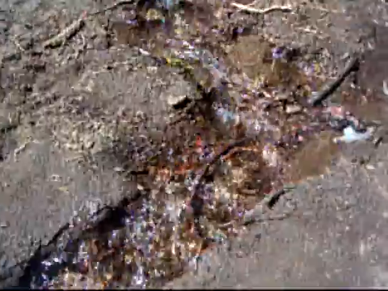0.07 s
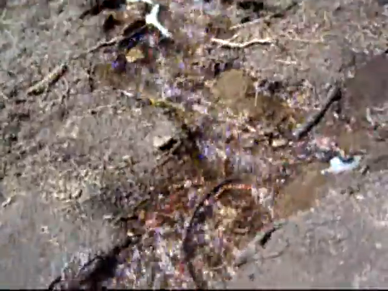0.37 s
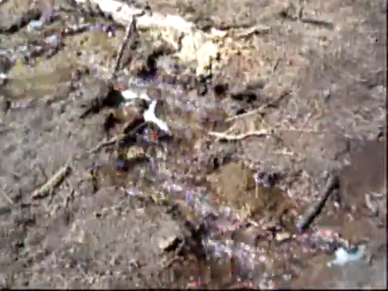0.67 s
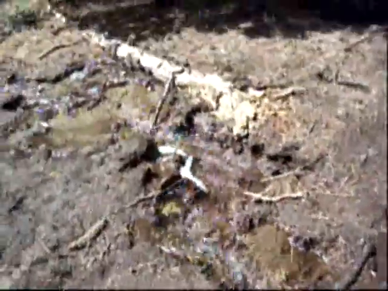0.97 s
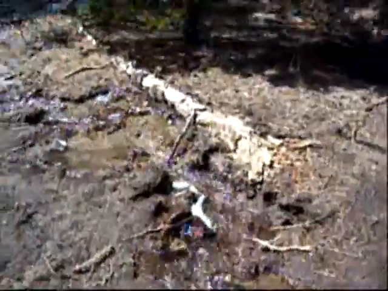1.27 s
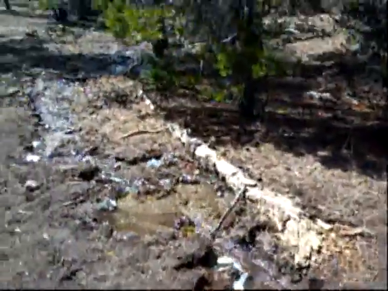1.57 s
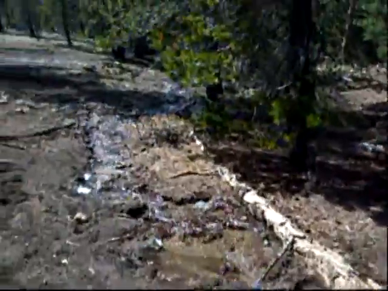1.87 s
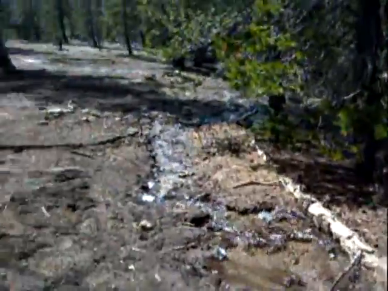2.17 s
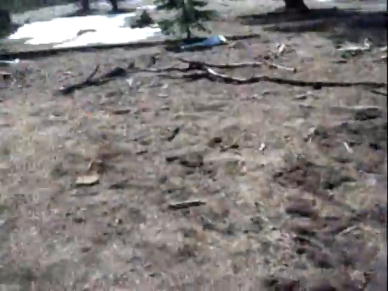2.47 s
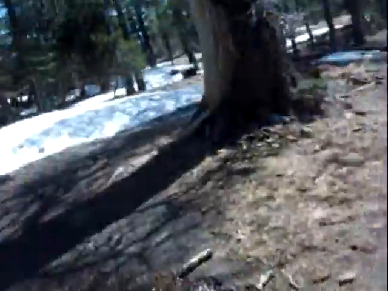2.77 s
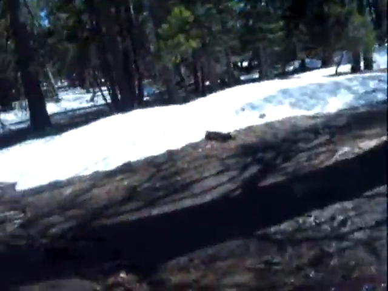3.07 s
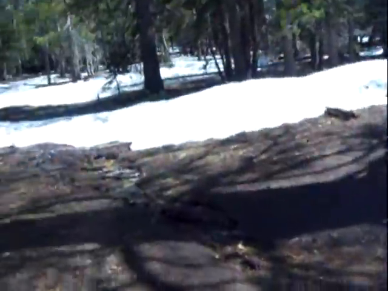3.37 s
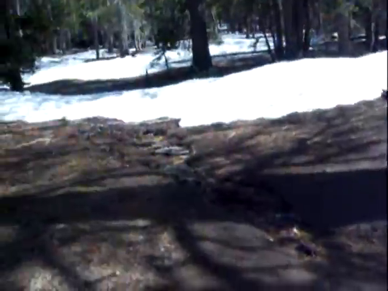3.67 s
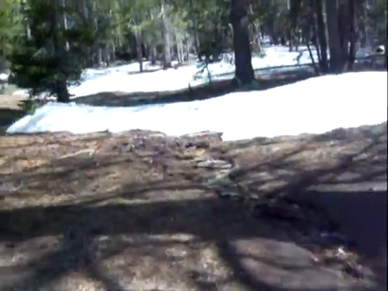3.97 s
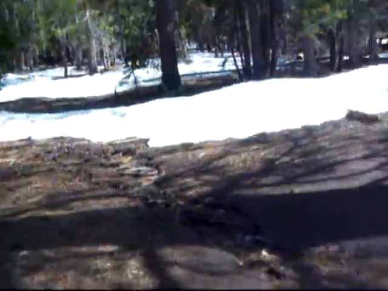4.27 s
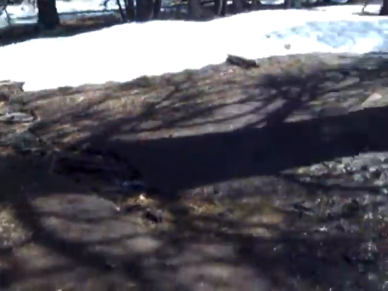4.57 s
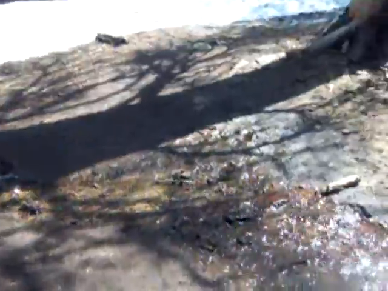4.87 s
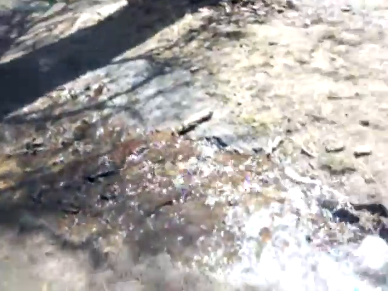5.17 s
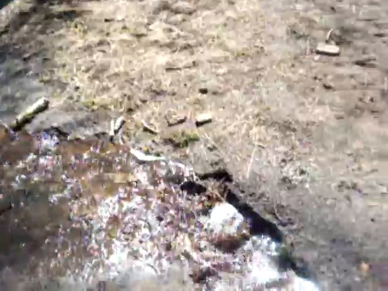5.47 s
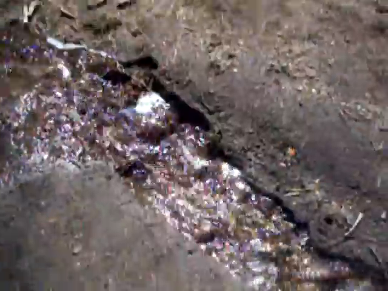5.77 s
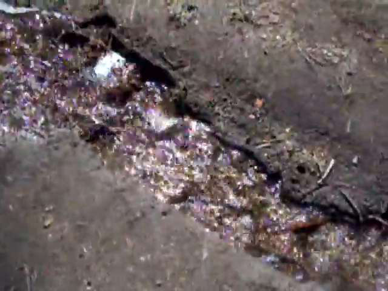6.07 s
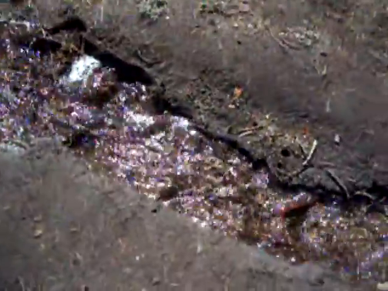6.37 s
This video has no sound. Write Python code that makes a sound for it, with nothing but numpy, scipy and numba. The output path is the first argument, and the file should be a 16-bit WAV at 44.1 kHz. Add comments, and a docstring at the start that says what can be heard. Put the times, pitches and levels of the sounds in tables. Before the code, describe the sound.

Heard through a small hand-held microphone outdoors, a little stream gurgles and splashes throughout, with a low rumble of air and soft bumps underneath. The rush loses some treble, then close scrapes of skin, one hard click and a quick clatter of knocks on plastic stand out well above it. The handling dies down and the water carries on, a little brighter for a moment.

```python
"""A shallow snowmelt stream trickles over stones in a forest, heard through a small hand-held camera.
From the start, ringing bubbles and bursting spray make the rush, over a low rumble and soft thumps.
From about 3 s the rush dulls as the camera turns away, and fingers begin to rub and slide on the case.
Between 4.4 and 5.6 s they knock on it, the hardest blows overloading the microphone.
Near 6 s the camera turns partly back and the water briefly brightens."""
import sys
import numpy as np
from scipy import signal
from scipy.fft import rfft, irfft
from scipy.io import wavfile
from scipy.ndimage import uniform_filter1d
from numba import njit

SR = 44100
rng = np.random.default_rng(int(sys.argv[2]) if len(sys.argv) > 2 else 0)


def unload_wav(signal):
    """Save mono or channel-first audio to the path in sys.argv[1] as 16-bit WAV at rate SR, clipped to [-1, 1]."""
    wavfile.write(
        sys.argv[1],
        SR,
        np.round(np.clip(np.atleast_2d(signal).T, -1, 1) * 32767).astype(np.int16),
    )


N = 287973
TIME = np.arange(N) / SR
FREQS = np.maximum(np.arange(N // 2 + 1) * SR / N, 1)

# the tone of the forest's low rumble: frequency_hz, gain_db
AIR_SPECTRUM = [(25, -12), (50, -4.5), (80, 5.5), (130, 1), (190, -3), (400, -29.5)]
# runs of soft thumps, each at its own pace: first_s, last_s, count
THUMP_RUNS = [(0.039, .925, 7), (1.155, 1.345, 3), (1.81, 2.615, 5), (2.846, 3.278, 6), (3.516, 3.634, 3),
              (3.81, 4.03, 3), (4.27, 4.8, 4), (5.21, 5.53, 4), (5.741, 6.487, 6)]
# the hand shifts its grip: start_s, end_s, level_db
GRIP_SHIFTS = [(4.09, 4.24, -39.5), (4.6, 4.66, -39), (4.8, 4.83, -37.5), (4.96, 5.01, -35),
               (5.29, 5.57, -38)]
# how the small hollows under a sliding fingertip ring: pitch_hz, width_hz, gain_db
FINGERTIP_MODES = [(1060, 240, -3.5), (1810, 560, 1.5), (2670, 220, -3), (3240, 460, -6), (4870, 700, -29)]
# finger strokes over the microphone hole: peak_s, rise_s, fall_s, level_db, treble_db_per_octave
RUB_STROKES = [(3.22, 0.062, 0.038, -37, 1.5), (4.11, 0.092, 0.091, -21, 1),
               (4.126, 0.038, 0.019, -13.5, 1.5), (4.227, 0.016, 0.022, -12, 2),
               (4.512, 0.026, 0.046, -22.5, -0.4)]
# the tone of rubbing skin: frequency_hz, gain_db
SKIN_SPECTRUM = [(50, -21), (120, -0.5), (350, 1), (800, 0), (1400, -1), (2500, -5), (5000, -9.5),
                 (7000, -16), (8000, -24)]
# knocks on the case: time_s, push_db, contact_ms, rattle_db, decay_ms
KNOCKS = [(4.408, -32, 0.4, -22, 1.3), (4.4755, -24, 0.54, -22, 5.6), (4.4970, 3, 0.4, -8.5, 2.6),
          (4.9352, -36, .5, -24.5, 2.2), (4.9383, -42, .3, -13.5, 1.13), (4.9637, -11, 0.32, -27.5, 10),
          (4.9990, -7, 1.25, -22.5, 5.5), (5.0178, -3.5, 0.62, -8, 5.9), (5.0333, -16, 0.45, -16.5, 11),
          (5.0510, -24, 0.69, -16, 13.6), (5.077, -3, 2.2, -15, 1.5), (5.0795, -10, 0.72, -7, 4.6),
          (5.0827, -3.5, 1.5, -5.5, 3.8), (5.6089, -11.5, .6, -27.5, 2.3)]
# how the plastic case rings: pitch_hz, width_hz, gain_db
CASE_MODES = [(626, 400, 1.5), (1290, 720, 1), (2020, 940, -3), (2780, 700, -0.5), (4000, 400, -12),
              (5670, 1400, -14)]
# the biggest single bubbles: start_s, pitch_hz, level_db
BIG_BUBBLES = [(.327, 516, -30), (.632, 620, -30), (.670, 4650, -27), (1.026, 770, -29.5),
               (1.336, 930, -26), (1.521, 1235, -25), (2.118, 1390, -25.5), (2.306, 3790, -25),
               (2.512, 2700, -23.5), (2.723, 4700, -30), (3.011, 1100, -29.5), (4.782, 3670, -18)]
# the stream's level and treble as the camera turns: time_s, gurgle_db, splash_shade_db, spray_shade_db
STREAM_OVER_TIME = [(0, -41, 0.5, 1.5), (2.5, -41.5, 0.9, 0.2), (3.0, -42.5, -3, -4),
                    (3.9, -44.5, -1.5, -3), (4.3, -42.5, -4.5, -12), (5.83, -43.5, -8, -12.5),
                    (6.08, -40, 0.3, -13.5), (6.5, -40.5, -5, -14)]
# the tone of the rushing water: frequency_hz, gain_db
WATER_SPECTRUM = [(200, -7), (300, -8), (440, -3), (600, -1.5), (1100, -2.5), (1700, -4), (2600, -8.5),
                  (3600, -11), (5000, -13.5), (7500, -16)]


def gain(db):
    """Turn decibels into a number to multiply by."""
    return 10 ** (np.asarray(db) / 20)


def normalise(x):
    """Scale a signal to an average strength (rms) of one."""
    return x / np.sqrt(np.mean(x ** 2))


def curves(table):
    """Join the rows of a timed table with straight lines, one curve per column."""
    times, *columns = np.transpose(table)
    return [np.interp(TIME, times, column) for column in columns]


def tone(spectrum, hz=FREQS):
    """Read a spectrum table's gain at the given frequencies."""
    points_hz, db = np.transpose(spectrum)
    return gain(np.interp(np.log(hz), np.log(points_hz), db))


def resonances(modes):
    """How strongly, and how late, a ringing object answers each frequency."""
    return sum(gain(db) / (1 + 1j * (FREQS ** 2 - hz ** 2) / (FREQS * width)) for hz, width, db in modes)


def filtered(x, response):
    """Weight each frequency of a signal, then normalise it."""
    return normalise(irfft(rfft(x, N) * response, N))


def wander(turns_per_s):
    """A smooth random curve that strays about one either side of zero."""
    step = int(SR / turns_per_s)
    stairs = np.repeat(rng.standard_normal(N // step + 1), step)
    return normalise(uniform_filter1d(stairs, step)[:N])


def held(start_s, end_s, fade_s):
    """Fade in before the start, hold at one, and fade out after the end."""
    return np.clip(1 + np.minimum(TIME - start_s, end_s - TIME) / fade_s, 0, 1)


def crackle(per_s, spread_db):
    """Tiny random clicks of unequal strength."""
    when, size, sign = rng.random((int(per_s * N / SR), 3)).T
    size_db = -spread_db * np.log(size + 1 / 30)
    return normalise(np.bincount((when * N).astype(int), gain(size_db) * np.sign(sign - .5), N))


def forest_air(level_db=-47, sway_db=1.35):
    """Outdoor air makes a low, slightly swaying rumble."""
    return filtered(rng.standard_normal(N), tone(AIR_SPECTRUM)) * gain(level_db + sway_db * wander(7.1))


def thumps(length_s=0.01097, edge_s=0.00064, level_db=-30.5, scatter_s=.002):
    """Short blunt dips in pressure, all alike, a little uneven in time."""
    times = np.concatenate([np.linspace(first, last, round(count)) for first, last, count in THUMP_RUNS])
    dips = np.zeros(N)
    for start_s in times + scatter_s * rng.standard_normal(len(times)):
        dips[int(start_s * SR):int((start_s + length_s) * SR)] = -gain(level_db)
    return uniform_filter1d(dips, int(edge_s * SR))


def grip_rumble(pitch_hz=42, width_hz=45, cutoff_hz=170, resting_db=-51):
    """The hand shudders through the camera body, more when it shifts its grip."""
    body = resonances([(pitch_hz, width_hz, 0)]) / (1 + (FREQS / cutoff_hz) ** 2)
    shifts = sum(gain(db) * held(start, end, fade_s=0.06) for start, end, db in GRIP_SHIFTS)
    return filtered(crackle(per_s=150, spread_db=0.5), body) * np.maximum(gain(resting_db), shifts)


def finger_slide(start_s=4.26, end_s=5.05, level_db=-38, ease_db_per_s=5, cutoff_hz=5500):
    """A fingertip slides on the case ever more lightly, ringing the small hollows under it."""
    pressure = held(start_s, end_s, fade_s=0.04) * gain(level_db - ease_db_per_s * (TIME - start_s))
    hollows = resonances(FINGERTIP_MODES) / (1 + (FREQS / cutoff_hz) ** 6)
    return filtered(crackle(per_s=4400, spread_db=5.0), hollows) * pressure


def finger_rubs(swell_db=18, slip_limit=0.8):
    """Skin sticks and slips over the microphone hole; each stroke swells and lets go."""
    strokes = 0
    for peak_s, rise_s, fall_s, level_db, tilt_db in RUB_STROKES:
        from_peak = np.maximum((peak_s - TIME) / rise_s, (TIME - peak_s) / fall_s)
        skin = tone(SKIN_SPECTRUM) * gain(tilt_db * np.log2(FREQS / 1000))
        slips = filtered(crackle(per_s=24000, spread_db=3.0), skin)
        strokes += slips * gain(level_db - swell_db * from_peak ** 3)
    return slip_limit * np.tanh(strokes / slip_limit)  # soft skin rounds off the biggest slips


def case_knocks(leak_hz=50, rebound=0.74, cutoff_hz=6000):
    """Each blow pushes on the microphone; the loose plastic case springs back and rattles briefly."""
    pushes, rattles = np.zeros(N), 0
    case = resonances(CASE_MODES) / (1 + (FREQS / cutoff_hz) ** 6)
    for time_s, push_db, contact_ms, rattle_db, decay_ms in KNOCKS:
        age_ms = (TIME - time_s) * 1000
        shake = gain(rattle_db) * (age_ms > 0) * np.exp(-(age_ms / decay_ms) ** 2)
        pushes += rebound * shake - gain(push_db) * np.exp(-(2 * age_ms / contact_ms) ** 2)
        # longer rattles and softer blows sound duller
        treble_db_per_octave = 4 - 2.1 * np.log2(decay_ms) - 3 * contact_ms
        tilt = gain(treble_db_per_octave * np.log2(np.clip(FREQS, 400, 6000)))
        rattles += shake * filtered(rng.standard_normal(N), case * tilt)
    # the pressure leaks away, so every push swings back
    return signal.sosfilt(signal.butter(1, leak_hz, "high", fs=SR, output="sos"), pushes) + rattles


def camera_shade(hz, splash_db, spray_db):
    """Turned away, the camera body blocks high sounds: the change in dB at a given pitch."""
    splash_share = np.interp(hz, [1400, 2700, 3600, 5800], [0, 1, 1, 0])
    spray_share = np.interp(hz, [3600, 5800], [0, 1])
    return splash_db * splash_share + spray_db * spray_share


@njit
def ring_bubbles(start_s, hz, cycles, size, pitch_rise):
    """Each bubble is a tone that builds quickly, fades by 60 dB and rises in pitch near the surface."""
    sound = np.zeros(N)
    for k in range(len(hz)):
        first, length = int(start_s[k] * SR), int(cycles[k] / hz[k] * SR) + 1
        angle = 2 * np.pi * hz[k] / SR
        wave = size[k] + 0j  # a point that circles and shrinks, tracing a fading sine
        turn = np.exp(1j * angle - np.log(1000) / length)
        bend = np.exp(1j * angle * pitch_rise / length)
        neck, closing = 1., np.exp(-20 / length)  # the tone builds as the bubble's neck closes
        for i in range(first, min(first + length, N)):
            wave *= turn
            turn *= bend
            neck *= closing
            sound[i] += 2 * wave.imag * (1 - neck)
    return sound


def plops(strays_per_s=3, low_hz=645, high_hz=2800, above_gurgle_db=8.5, pitch_rise=.1):
    """Single air pockets ring close by: a few big ones, and random strays that fade with the stream."""
    when, pitch = rng.random((int(strays_per_s * N / SR), 2)).T
    stray_hz = low_hz * (high_hz / low_hz) ** pitch
    gurgle_db, splash_db, spray_db = (curve[(when * N).astype(int)] for curve in curves(STREAM_OVER_TIME))
    stray_db = above_gurgle_db + gurgle_db + camera_shade(stray_hz, splash_db, spray_db)
    strays = np.column_stack([when * N / SR, stray_hz, stray_db])
    start_s, hz, level_db = np.vstack([BIG_BUBBLES, strays]).T.copy()
    cycles = 26 * (hz / 1000) ** 0.27  # smaller, higher bubbles ring for more cycles
    return ring_bubbles(start_s, hz, cycles, gain(level_db), pitch_rise)


def bubble_swarm(centre_hz, per_s=200, spread_db=5.0, pitch_rise=0.1):
    """Bubbles ring within a third of an octave: many faint ones, a few strong."""
    when, pitch, life, size = rng.random((int(per_s * N / SR), 4)).T
    hz = centre_hz * 2 ** ((pitch - .5) / 3)
    cycles = 13 * (centre_hz / 1000) ** 0.43 * (.5 + life)
    size_db = -spread_db * np.log(size + 1 / 80)
    return normalise(ring_bubbles(when * N / SR, hz, cycles, gain(size_db), pitch_rise))


def stream(wash_db=-3, spray_at_5khz_db=-5, flicker_db=0.81, surge_db=0.3):
    """Bubbles ring nearby, a smooth wash comes from further along, and spray bursts in the treble."""
    gurgle_db, splash_db, spray_db = curves(STREAM_OVER_TIME)
    hiss, bursts = rng.standard_normal(N), crackle(per_s=700, spread_db=7.5)
    centres_hz = 200 * 2 ** (np.arange(17) / 3)  # three bands to an octave
    weights = tone(WATER_SPECTRUM, centres_hz) * np.sqrt(centres_hz)  # higher bands are wider
    weights /= np.linalg.norm(weights[4:10])  # the gurgle level belongs to the 500-1600 Hz bands
    rush = 0
    for hz, weight in zip(centres_hz, weights):
        band = np.sqrt(np.clip(1 - abs(3 * np.log2(FREQS / hz)), 0, 1))
        wash = gain(wash_db) * filtered(hiss, band)
        spray = gain(spray_at_5khz_db) * hz / 5000 * filtered(bursts, band)
        water = normalise(bubble_swarm(hz) + wash + spray)
        rush += weight * water * gain(camera_shade(hz, splash_db, spray_db) + flicker_db * wander(14))
    return rush * gain(gurgle_db + surge_db * wander(5))


def scene():
    """The water, the low background and the hand all reach one microphone."""
    water = stream() + plops()
    background = forest_air() + thumps()
    hand = grip_rumble() + finger_slide() + finger_rubs() + case_knocks()
    return (water + background + hand)[None]


def record(dry, notch_hz=4306, notch_width_hz=184, notch_depth=0.63, clip_level=0.78):
    """The microphone hole notches the treble; the recorder trims lows and highs and clips hard knocks."""
    notch = 1 - notch_depth * resonances([(notch_hz, notch_width_hz, 0)])
    x = irfft(rfft(dry) * notch, N)
    x = signal.sosfilt(signal.butter(1, 12, "high", fs=SR, output="sos"), x)
    x = np.clip(x, -clip_level, clip_level)
    x = signal.sosfilt(signal.butter(10, 7800, fs=SR, output="sos"), x)
    x = signal.sosfilt(signal.ellip(8, .2, 70, 8500, fs=SR, output="sos"), x)
    # the filters overshoot on flattened peaks, which clip again and splatter into the high treble
    x = np.clip(x, -clip_level, clip_level)
    return signal.sosfilt(signal.ellip(8, .2, 70, 16000, fs=SR, output="sos"), x)


dry = scene()
out = record(dry)
unload_wav(out)
```